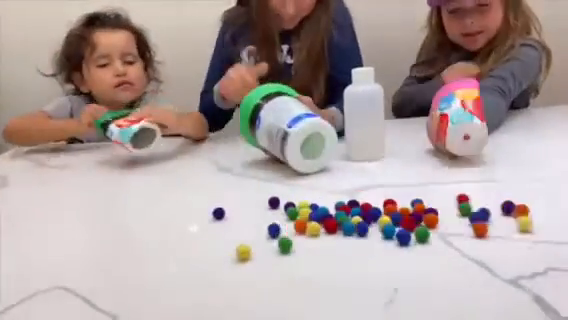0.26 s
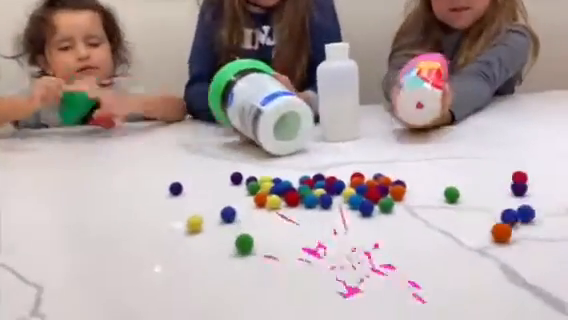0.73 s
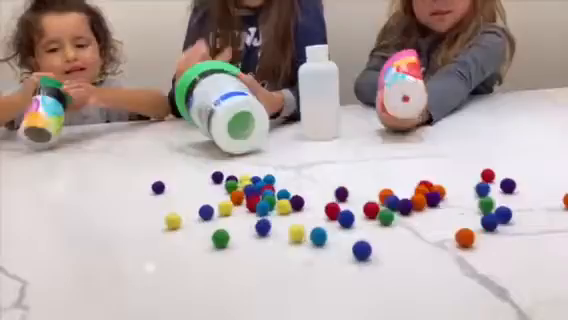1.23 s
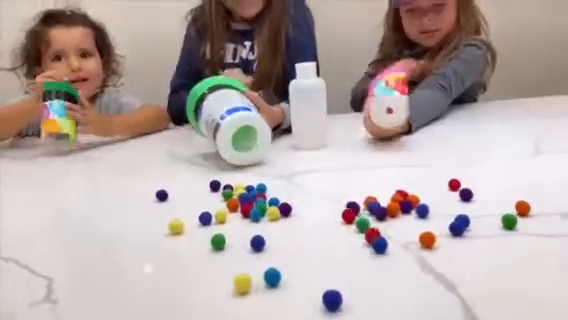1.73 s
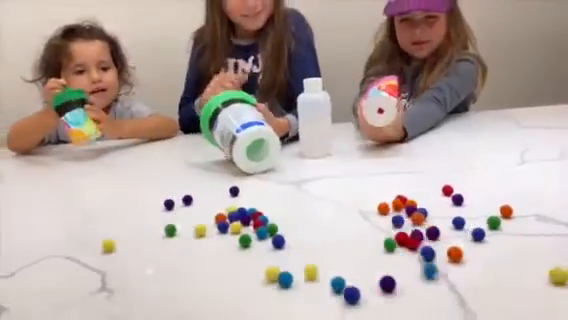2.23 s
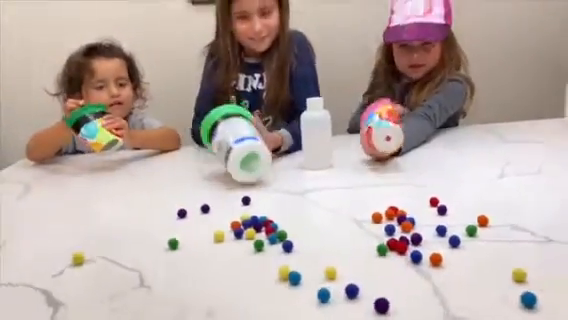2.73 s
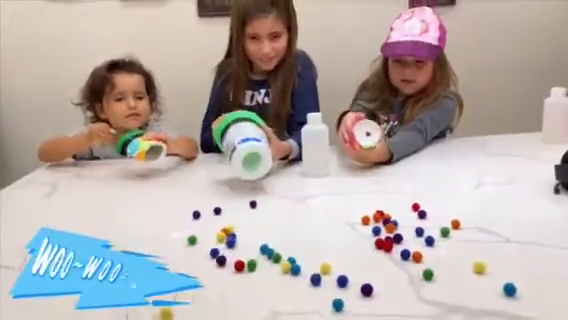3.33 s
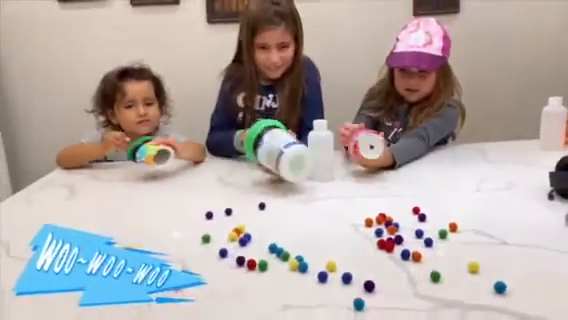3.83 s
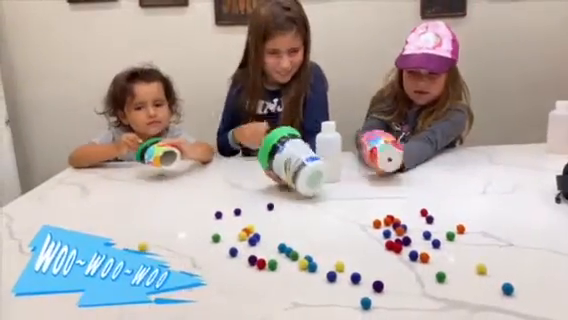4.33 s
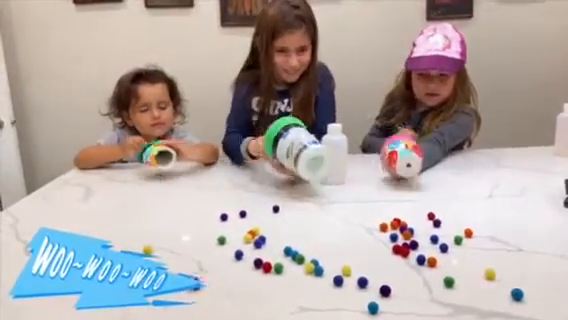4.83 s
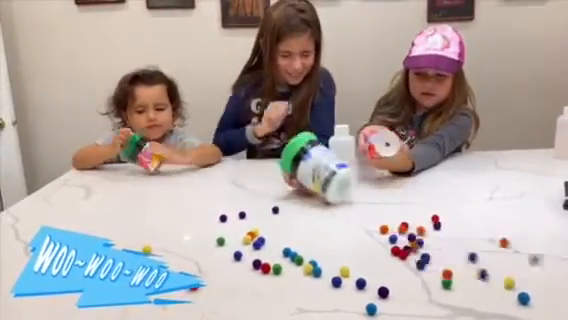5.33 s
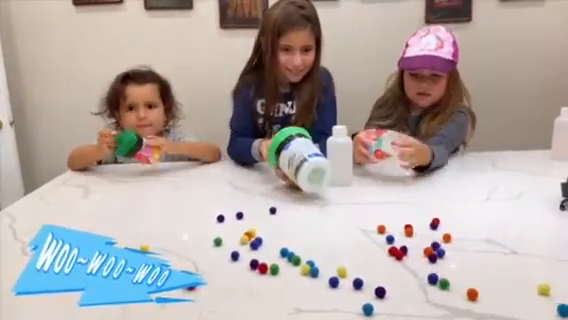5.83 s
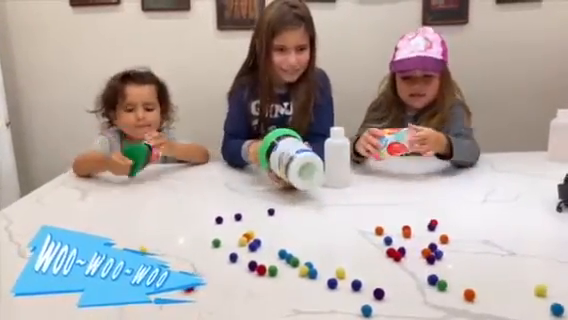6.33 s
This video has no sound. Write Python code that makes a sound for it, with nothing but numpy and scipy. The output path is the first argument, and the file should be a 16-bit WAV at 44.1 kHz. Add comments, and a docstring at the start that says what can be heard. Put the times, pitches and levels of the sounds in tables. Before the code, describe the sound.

A hard table in a bare, reverberant room, heard through a phone, with faint low hum and hiss. At 0 s a moderate jar snap starts at once, followed by paper-cup pops at 0.15 and 0.33 s, with hand scuffs and knocks until 0.65. Louder jar shots crack at 0.9, 1.7, 2.8, 3.95 and 5.15 s: rubber slapping a rim, a short hollow ring, a puff of low air, then half a second of echo; they overload and flatten. Smaller, drier cup snaps fall at 1.55, 2.5, 4.35 and 4.6 s. Clacks and contact ticks gather around 1.2 s, faint ones near 2.3 and 3.4, a heavier thump at 3.77. A strong cluster of cup knocks runs from 4.7 to 5.1 s. After the final shot the echo fades, leaving light knocks, soft scuffs and papery rustles from 5.7 to 6.4 s.

```python
"""Balloon-skin cannons on a table

Balloon skins stretched over a large jar and over paper cups are pulled back and let go on a hard table
in a bare room. Each skin slaps its rim, the vessel rings as decaying modes and air booms out; cups knock,
scuff and rustle in the hands as filtered clicks and noise, over a low hum.
The room rings for half a second as decaying noise; loud shots overload the input of a phone."""
import sys
import numpy as np
from scipy import signal
from scipy.fft import rfft, irfft, next_fast_len
from scipy.io import wavfile
from scipy.ndimage import uniform_filter1d

SR = 44100
rng = np.random.default_rng(int(sys.argv[2]) if len(sys.argv) > 2 else 0)


def wrap_up_sound(samples):
    """Save the sound to the file named by the first command line argument, as 16-bit audio."""
    columns = np.atleast_2d(samples).T
    # keep every value between -1 and 1, then stretch to whole-number steps
    tamed = np.clip(columns, -1, 1)
    steps = np.round(tamed * 32767).astype(np.int16)
    wavfile.write(sys.argv[1], SR, steps)


N = 289880

# spectral hump of cup contacts: (frequency [ratio to ring frequency], level [dB])
CONTACT_HUMP = [(.25, -20.5), (.55, -2), (0.801, -0.5), (1.0, 9), (1.25, -6.5), (1.6, -11.5), (2.3, -13.5),
                (4.0, -34.5)]
# stereo difference of room and hum: (frequency [Hz], side against mid [dB])
SIDE_SPECTRUM = [(60, -13), (125, -14), (250, -12), (500, -3), (2000, -2), (8000, -2)]
CUP_PAN_DB = 4  # left minus right


def cannon(shots, modes, rim_modes, skin):
    """A short noise swells up to each shot, skin cracks on the rim, vessel and rim ring, loose skin hisses, air booms.

    The vessel is held a little elsewhere each time, so every shot meets its own echoes."""
    # skin on rim: (frequency [Hz], level [dB])
    slap_spectrum = [(300, -7), (1000, -2), (2500, -15.5), (5000, -21), (9000, -23.5), (16000, -9.5)]
    # hard rim under the skin: (frequency [Hz], level [dB])
    bite_spectrum = [(800, -48), (1250, -10.5), (1550, 0), (1800, 2.5), (2050, -6.5), (2400, -0.5),
                     (2800, -5), (3150, -9.5), (4500, -9.5), (8000, -21)]
    # air pushed out of the mouth, held by the lowest room modes: (frequency [Hz], level [dB], t60 [s])
    boom_modes = [(59, -18, 0.21), (76.6, -14, 0.3), (121, -15.5, 0.14), (148, -18, 0.27)]
    wet_db, rim_db = 5.5, -14  # rim against the ring
    swell_max_s, swell_decay_s = 0.02, 0.0022
    strike_rise_s, rim_rise_s, boom_rise_s = 0.00095, 0.0031, 0.0035

    track, t = np.zeros((2, N)), np.arange(SR) / SR
    bite_db, buzz_db, swell_db, flutter_s, pan_db = skin
    strike = push(t, strike_rise_s)
    for s, db, slap_db, boom_db, tuning, tilt_db in shots:
        swell, flutter, buzz = (unit(colour(rng.standard_normal((2, len(t))), spectrum))
                                for spectrum in (slap_spectrum, slap_spectrum, bite_spectrum))

        before = t < min(s, swell_max_s)
        swelling = undb(db + swell_db) * swell * np.exp(-t / swell_decay_s)
        # reversed: swells up to the shot
        add(track, s - before.sum() / SR, swelling[:, before][:, ::-1], pan_db)

        crack = undb(slap_db) * click(slap_spectrum, t) + undb(bite_db) * click(bite_spectrum, t)
        struck = undb(db) * (ring(modes, t, tuning, tilt_db) + crack) * strike
        add(track, s, room(np.array([struck, struck]), wet_db), pan_db)

        # rim, loose skin and boom stay dry
        add(track, s, undb(db + rim_db) * ring(rim_modes, t) * push(t, rim_rise_s), pan_db)
        loose = undb(slap_db - 7.5) * flutter + undb(buzz_db) * buzz
        add(track, s, undb(db) * loose * np.exp(-t / flutter_s) * strike, pan_db)
        boom = ring(boom_modes, t) * push(t, boom_rise_s)
        add(track, s, undb(db + boom_db) * boom, pan_db / 4)
    return track


def knocks():
    """A short dull clack, a tick of contact and a thud of the table; thumps are table and contact alone."""
    # cups and fingers on the table: (time [s], level [dB], ring [Hz], tick against clack [dB])
    knock_events = [(0.338, -2, 1050, 4), (0.546, -13, 900, 17), (0.618, -16.5, 985, 13),
                    (0.645, -2.5, 825, 6.5), (0.645, -8.5, 570, -35), (0.884, -23, 770, -34),
                    (1.108, -22.5, 1450, 19), (1.16, -22.5, 1300, 15), (1.182, -24, 2510, 0),
                    (1.235, -2.5, 1155, -18), (1.236, -10.5, 1425, -22), (1.247, -21, 2780, -33),
                    (1.281, -31, 1140, -34), (1.321, -24, 2400, -13), (2.247, -32, 1080, -27),
                    (2.29, -26, 690, -30), (2.313, -19.5, 627, -42), (2.38, -23.5, 730, 4),
                    (2.404, -23.5, 730, 15.5), (3.254, -34, 670, -34), (3.41, -17.5, 680, -37),
                    (3.465, -23.5, 750, -22), (3.624, -23, 710, 5), (3.655, -20, 644, -28),
                    (3.702, -27, 706, -12), (3.768, -14, 1860, -28), (3.77, -18, 1310, -28),
                    (3.772, -17, 845, -32), (3.856, -30, 880, 9), (4.305, -15.5, 820, -23),
                    (4.704, -2, 770, -25), (4.834, 0, 1340, 9.5), (4.865, -3.5, 1660, -25),
                    (4.865, -3, 819, -28), (4.928, -2.5, 770, 9), (4.93, -7.5, 2480, -6),
                    (4.963, -18, 1350, 18), (5.053, -15, 860, 11), (5.111, -25.5, 1200, 19.5),
                    (5.709, -28.5, 1090, -29), (5.758, -41, 720, -3), (5.829, -17, 744, 8.5),
                    (5.829, -21, 1160, -20), (5.831, -19, 2310, -10), (5.867, -39, 750, -20),
                    (6.099, -27, 2400, -29), (6.115, -23.5, 2500, 10.5), (6.148, -45, 990, 6),
                    (6.332, -13.5, 1030, -30), (6.333, -24, 1680, -23)]
    # something heavier set down: (time [s], level [dB], tuning [ratio])
    thump_events = [(0.5, -18, 0.49), (0.518, -25.5, 0.48), (.648, -14.5, 1.24), (1.236, -15.5, 1.29),
                    (2.315, -29.5, 0.41), (3.415, -31, 0.31), (3.77, -4, 1.01), (4.347, -8.5, 0.76),
                    (4.832, -14.5, 1.16), (6.341, -36, 0.42)]
    # cup modes: (frequency [ratio to ring frequency], level [dB], t60 [s])
    clack_modes = [(.91, -4, .014), (1.0, 0, .016), (1.1, -3, .014), (1.5, -12, .01)]
    # table modes at tuning 1: (frequency [Hz], level [dB], t60 [s])
    thud_modes = [(143, -18, .02), (305, -10, .045), (362, -6, .045), (550, -9, .016)]
    # contact of a thump at tuning 1: (frequency [Hz], level [dB])
    thump_spectrum = [(150, -21), (550, -12), (1200, 28), (2000, 15), (2300, -40), (5000, -54)]
    clack_ring_db, thud_db, thump_contact_db = -5.5, -16.5, -8.5
    knock_rise_s, thump_rise_s = 0.0012, 0.00066
    wet_db, table_db = -0.5, -5

    track, t = np.zeros((2, N)), np.arange(4096) / SR
    tick = click([(1200, 2.0), (3500, -4.0), (7000, -12), (16000, -3.5)], t)  # (Hz, dB)
    for s, db, hz, tick_db in knock_events:
        clack = click(np.array(CONTACT_HUMP) * [hz, 1], t)
        clack = clack + undb(clack_ring_db) * ring(clack_modes, t, hz)
        sound = clack + undb(tick_db) * tick + undb(thud_db) * ring(thud_modes, t)
        add(track, s, undb(db) * rattle(sound * push(t, knock_rise_s)), CUP_PAN_DB)
    for s, db, tuning in thump_events:
        contact = click(np.array(thump_spectrum) * [tuning, 1], t)
        sound = ring(thud_modes, t, tuning) + undb(thump_contact_db) * contact
        add(track, s, undb(db) * rattle(sound * push(t, thump_rise_s)), CUP_PAN_DB)
    return room(track, wet_db, table_db)


def scuffs():
    """Dense uneven grains in the same hump as the knocks, swelling and fading without a hard start."""
    # cups dragged, turned or squeezed, the skin squeaking as it slips from the fingers just before a shot, and
    # a high ring just after one shot: (start [s], length [s], level before swell [dB], ring [Hz])
    scuff_events = [(0.136, 0.015, -14, 1100), (0.162, 0.12, -41.5, 4530), (0.198, 0.078, -29, 1150),
                    (0.371, 0.14, -26.5, 1000), (0.401, 0.14, -37, 1360), (1.012, 0.018, -19, 970),
                    (1.52, 0.022, -18.5, 1790), (4.84, 0.033, -32, 1440), (4.942, 0.073, -32.5, 1320),
                    (5.1, 0.012, -25.5, 760), (5.803, 0.023, -33, 1100), (5.804, 0.021, -39, 746),
                    (5.824, 0.038, -45.5, 1780), (5.994, 0.044, -46, 860), (5.996, 0.057, -50, 1900),
                    (6.125, 0.044, -52, 2600), (6.098, 0.042, -40, 1030), (6.299, 0.067, -38, 825),
                    (6.305, 0.026, -51, 2350), (6.34, 0.16, -44.5, 890)]
    wet_db = 4

    track, t = np.zeros((2, N)), np.arange(int(.2 * SR)) / SR
    for s, length_s, db, hz in scuff_events:
        grains = rng.standard_normal(len(t)) * undb(3 * rng.exponential(size=len(t)))
        swell = np.sin(np.pi * np.minimum(t / length_s, 1) ** 0.65) ** 2
        scrape = unit(colour(grains, np.array(CONTACT_HUMP) * [hz, 1]))
        add(track, s, undb(db) * scrape * swell, CUP_PAN_DB / 4)
    return room(track, wet_db)


def rustle():
    """Dense creases of uneven size, coloured by the paper cup; bouts swell fast, hold unevenly and die away."""
    # paper and rubber worked by fingers: (start [s], hold [s], level [dB])
    bouts = [(1.318, 0.0094, -37.5), (1.443, 0.013, -44), (2.404, 0.045, -41.5), (3.393, 0.5, -50),
             (5.806, 0.018, -45.5), (6.002, 0.02, -43.5), (6.104, 0.012, -40.5), (6.314, 0.0069, -39.5)]
    # paper cup: (frequency [Hz], level [dB])
    paper_spectrum = [(300, -16.5), (720, -1.5), (900, -0.5), (1100, -6), (1500, -12.5), (1950, -12),
                      (2450, -11), (3000, -19), (4000, -17), (8000, -26.5), (16000, -13.5)]
    creases_per_s, grip_db_per_s, let_go_db_per_s = 1500, 714, 168
    wander_db, wander_samples, wet_db = 0.5, 1500, 1.5

    t = np.arange(N) / SR
    creases = (rng.random(N) < creases_per_s / SR) * undb(2.5 * rng.exponential(size=N))
    creases = creases * rng.standard_normal(N)
    gain = np.zeros(N)
    for s, hold_s, db in bouts:
        grip_db = grip_db_per_s * np.maximum(s - t, 0)
        let_go_db = let_go_db_per_s * np.maximum(t - s - hold_s, 0)
        gain += undb(db - grip_db - let_go_db)
    wander = undb(wander_db * unit(smooth_steps(N, wander_samples)))
    sound = unit(colour(creases, paper_spectrum)) * gain * wander
    return room(np.array([sound, sound]), wet_db)


def hum():
    """Low steady murmur of the house and microphone hiss, as filtered noise."""
    # (frequency [Hz], level [dB])
    hum_spectrum = [(30, -15), (75, -1.5), (115, -11), (355, -16), (554, -13), (1460, -27), (8000, -46.5),
                    (16000, -29.5)]
    level_db = -45.5
    return undb(level_db) * unit(colour(stereo_noise(N), hum_spectrum))


def room(dry, wet_db, table_db=1.5):
    """Direct sound, table echoes and a tail that builds in a few ms and dies band by band; bass nearly mono."""
    # reverberation: (frequency [Hz], t60 [s])
    t60_points = [(60, 1), (160, 0.61), (420, 0.54), (1100, 0.59), (2900, 0.6), (7700, 0.57), (14000, 0.38)]
    # echo colour: (frequency [Hz], level [dB])
    echo_spectrum = [(60, -11), (160, 6.5), (420, 3), (800, 2), (1500, 0), (3000, 2.5), (7700, 1.5),
                     (14000, 0)]
    early_db, early_s = -2.5, 0.03  # table top and near walls answer first and strongest
    tail_rise_s, table_rise_s, table_s = 0.0052, 0.00073, 0.0031
    clump_db, clump = 3, int(.003 * SR)  # uneven clumps of 3 ms

    t = np.arange(int(.9 * SR)) / SR
    noise = colour(stereo_noise(len(t)), echo_spectrum)
    hz, _, cells = signal.stft(noise, SR, nperseg=1024)
    frame_s = np.arange(cells.shape[-1]) * 512 / SR
    fading = np.exp(-np.log(1000) * frame_s / along(t60_points, hz)[:, None])
    tail = signal.istft(cells * fading, SR, nperseg=1024)[1][:, :len(t)]
    tail = tail * push(t, tail_rise_s) * (1 + undb(early_db) * np.exp(-t / early_s))
    tail = tail * undb(clump_db * smooth_steps(len(t), clump))
    tail = tail / np.sqrt(np.sum(tail ** 2) / 2)

    # echoes off the table top and the things on it
    table = noise[:, ::-1] * push(t, table_rise_s) * np.exp(-t / table_s)
    table = table / np.sqrt(np.sum(table ** 2) / 2)
    echoes = undb(wet_db) * tail + undb(table_db) * table
    mono = dry.mean(axis=0, keepdims=True)
    return dry + signal.fftconvolve(mono, echoes, axes=1)[:, :dry.shape[1]]


def ring(modes, t, tuning=1, tilt_db=0):
    """Struck modes, neighbours in opposite phase, each a little off pitch and strength at every blow; peak 1."""
    hz, db, t60 = np.transpose(modes)[:, :, None]
    chance = rng.standard_normal((len(modes), 2))
    phase = 2 * np.pi * hz * tuning * (1 + .015 * chance[:, :1]) * t
    phase = phase + np.pi * np.arange(len(modes))[:, None]
    level_db = db + tilt_db * np.log2(hz / 700) + 1.5 * chance[:, 1:]  # tilt in dB per octave
    y = np.sum(undb(level_db) * np.sin(phase) * np.exp(-np.log(1000) * t / t60), axis=0)
    return y / np.abs(y).max()


def click(spectrum, t):
    """One short contact with a smooth spectrum, swelling to its peak of 1 after 2 ms."""
    impulse = 1. * (np.arange(len(t)) == int(.002 * SR))
    y = colour(impulse, spectrum) * np.exp(-(t / .04) ** 2)
    return y / np.abs(y).max()


def push(t, rise_s):
    """Contact force grows smoothly from 0 to 1."""
    return 1 - np.exp(-(t / rise_s) ** 2)


def rattle(sound):
    """The first contact is followed by a few ms of dying loose ones; they share its energy."""
    loose_db, decay_s, contacts_per_s = -1, 0.0023, 600
    t = np.arange(1024) / SR
    loose = (rng.random(len(t)) < contacts_per_s / SR) * rng.standard_normal(len(t))
    contacts = (t == 0) + undb(loose_db) * loose * np.exp(-t / decay_s)
    y = signal.fftconvolve(sound, contacts)
    return y * np.sqrt(np.sum(sound ** 2) / np.sum(y ** 2))


def stereo_noise(size):
    """Mid noise plus coloured side noise of opposite sign in the two channels."""
    mid, side = rng.standard_normal((2, size))
    return mid + colour(side, SIDE_SPECTRUM) * np.array([[1], [-1]])


def smooth_steps(size, step):
    """Random steps smoothed over one step length."""
    steps = np.repeat(rng.standard_normal(size // step + 1), step)[:size]
    return uniform_filter1d(steps, size=step)


def undb(db):
    """Amplitude ratio of a level in dB."""
    return 10 ** (np.asarray(db) / 20)


def along(table, hz):
    """Value of (Hz, value) points, straight on a log-frequency axis."""
    at, value = np.transpose(table)
    return np.interp(np.log(np.maximum(hz, 1)), np.log(at), value)


def colour(x, spectrum):
    """Filters x to (Hz, dB) points without phase shift."""
    size = next_fast_len(x.shape[-1])
    hz = np.arange(size // 2 + 1) * SR / size
    return irfft(rfft(x, size) * undb(along(spectrum, hz)), size)[..., :x.shape[-1]]


def unit(x):
    """Scales to an RMS of 1."""
    return x / np.sqrt(np.mean(x ** 2))


def add(track, s, sound, pan_db):
    """Mixes a sound in at s seconds; pan_db is left minus right."""
    at = max(int(s * SR), 0)
    sound = sound[..., :N - at]
    track[:, at:at + sound.shape[-1]] += sound * undb([[pan_db / 2], [-pan_db / 2]])


def scene():
    """Jar and cup shots over hand noises and hum."""
    # each shot has its own tuning and tilt; the cups differ in pitch: (time [s], ring level [dB],
    # slap against ring [dB], boom against ring [dB], tuning [ratio], tilt [dB per octave])
    jar_shots, cup_shots = [(0.001, 4.8, -10, -14, 1.06, 3.5), (0.905, 10.34, 1.5, -9, 1.043, 2.5),
                            (1.710, 12, -6.5, -9, 1, 3.1), (2.803, 12.7, 2, -12.5, 0.99, 3.8),
                            (3.963, 12.76, 4, -14.5, 1.007, 2.5), (5.152, 12.4, -3, -13.5, 1.03, 4.5)], [(0.147, 5, -8, -16, 0.92, -1.7),
                                               (0.325, -2.5, -13, -12, 1.13, -3.6),
                                               (1.532, 4, 1.5, -19, 1.055, -2.8),
                                               (2.503, 7.5, -10, -28.5, 0.96, 2.1),
                                               (4.346, -4.5, 4.5, -53, 1.03, -0.34),
                                               (4.619, 7.5, -3.5, -25, 0.99, 0.65)]
    # vessel modes at tuning 1 and tilt 0: (frequency [Hz], level [dB], t60 [s])
    jar_modes, cup_modes = [(131, -9, 0.025), (222, -8.5, 0.032), (375, 3, 0.016), (598, -4.5, 0.021),
                            (773.6, -2, 0.025), (1002, 11.5, 0.0028), (1123, -4.5, 0.01),
                            (1953, -25, 0.021)], [(300, -3.5, 0.0097), (451, -17, 0.033), (734, 2, 0.018),
                                         (1100, 5, 0.005), (1290, -1, 0.0073)]
    # stiff rim modes: (frequency [Hz], level [dB], t60 [s])
    jar_rim, cup_rim = [(1774, 10, 0.13), (2400, -8, 0.42)], [(2274, -4, 0.15), (1550, -5, 0.039)]
    # skin, levels against the ring: (bite [dB], buzz [dB], swell [dB], flutter decay [s], left minus right [dB])
    jar_skin, cup_skin = (-3.5, -74, -13.5, 0.0046, 1), (1, -43, -14, 0.051, 1.1)

    jar = cannon(jar_shots, jar_modes, jar_rim, jar_skin)
    cups = cannon(cup_shots, cup_modes, cup_rim, cup_skin)
    return jar + cups + knocks() + scuffs() + rustle() + hum()


def record(dry):
    """Deep bass is dropped and the treble dulled; the input flattens all above full scale; the top is cut."""
    # treble roll-off: (frequency [Hz], level [dB])
    treble_rolloff = [(9000, 0), (13000, -8), (16000, -12)]
    low_hz, top_hz = 43, 15900
    low_cut = signal.butter(2, low_hz, "high", fs=SR, output="sos")
    top_cut = signal.ellip(8, .2, 70, top_hz, fs=SR, output="sos")
    heard = colour(signal.sosfilt(low_cut, dry), treble_rolloff)
    clipped = np.clip(heard, -1, 1)
    return np.clip(signal.sosfilt(top_cut, clipped), -1, 1)


dry = scene()
out = record(dry)
wrap_up_sound(out)
```